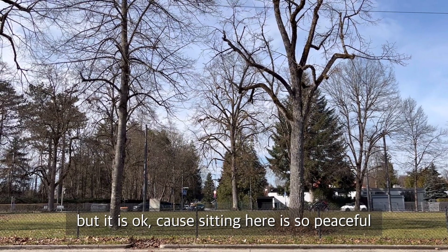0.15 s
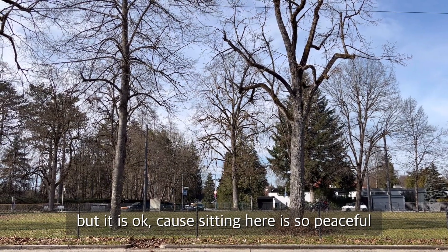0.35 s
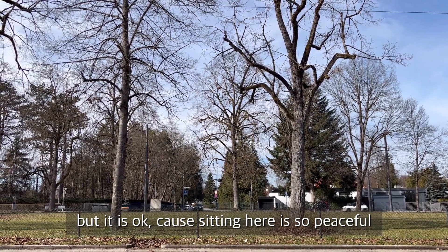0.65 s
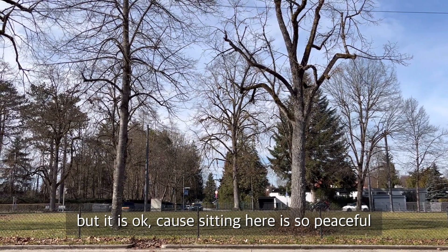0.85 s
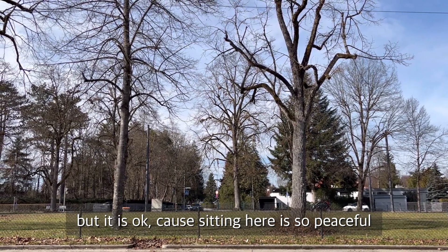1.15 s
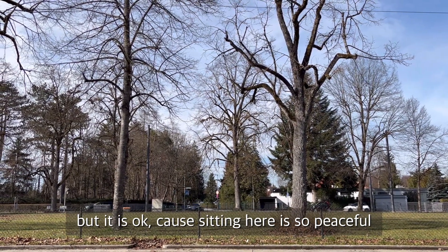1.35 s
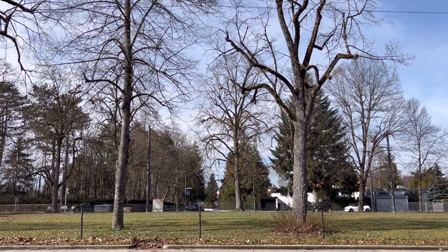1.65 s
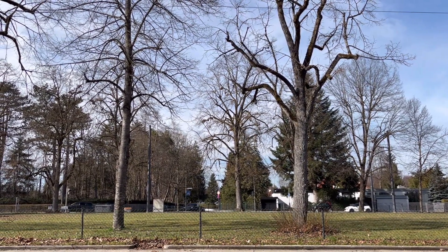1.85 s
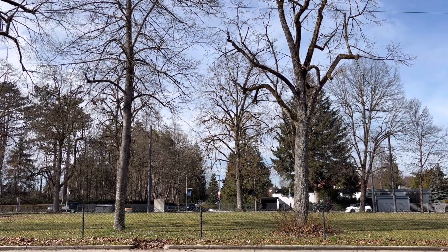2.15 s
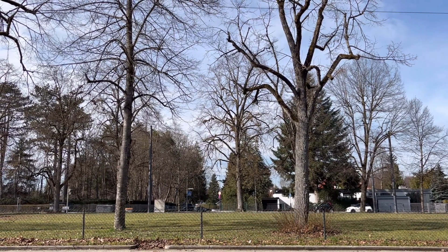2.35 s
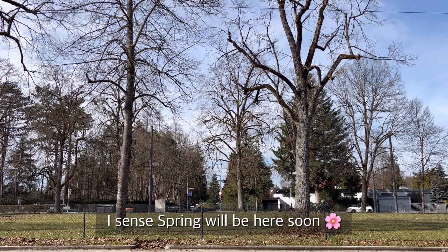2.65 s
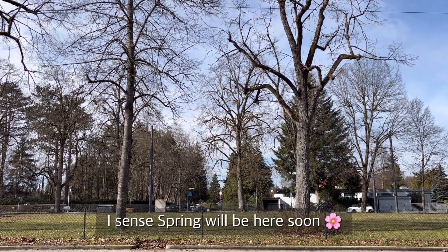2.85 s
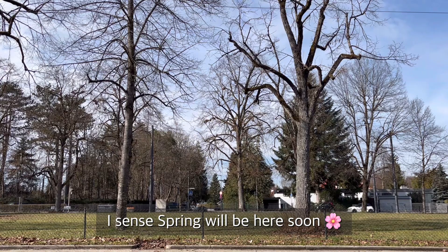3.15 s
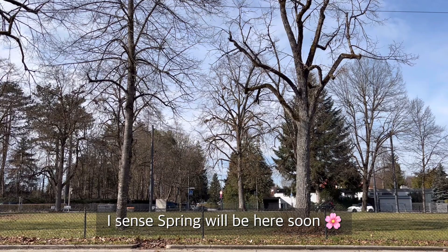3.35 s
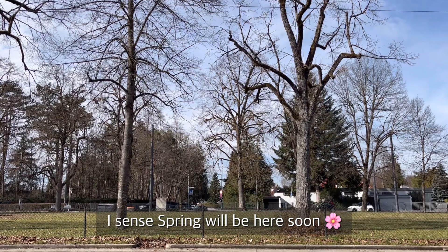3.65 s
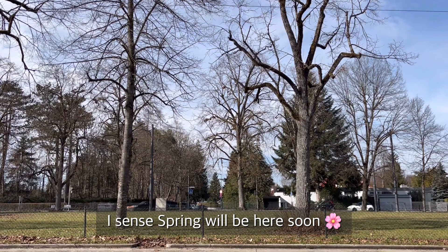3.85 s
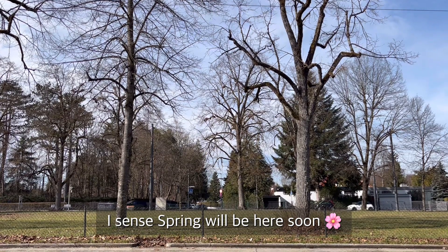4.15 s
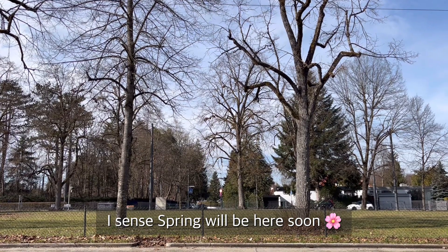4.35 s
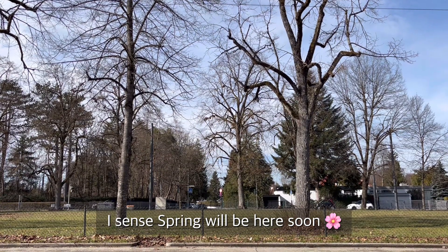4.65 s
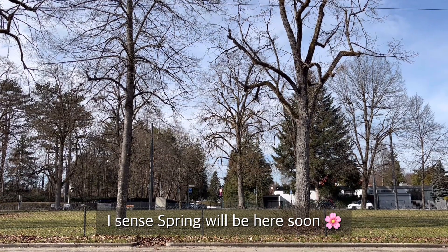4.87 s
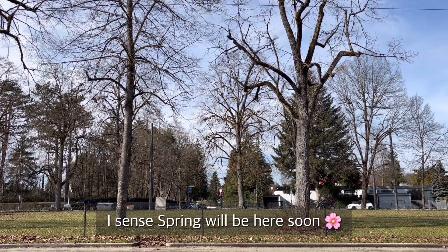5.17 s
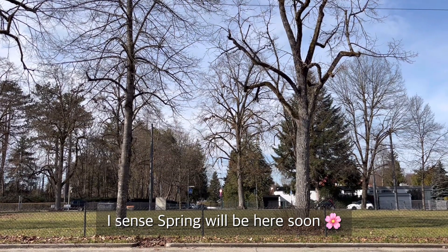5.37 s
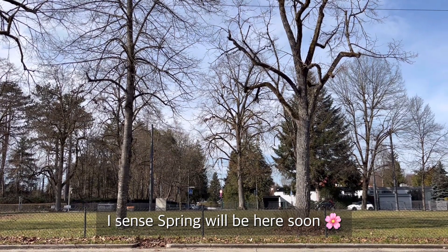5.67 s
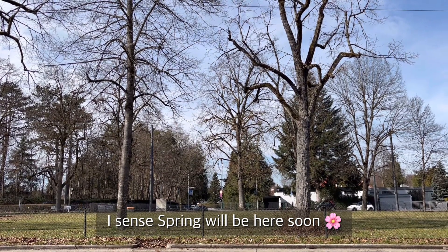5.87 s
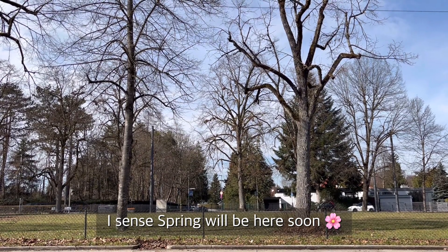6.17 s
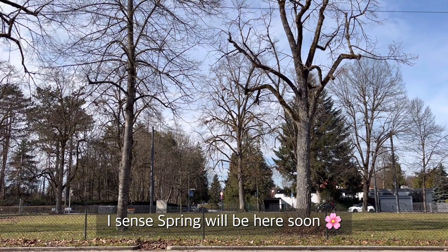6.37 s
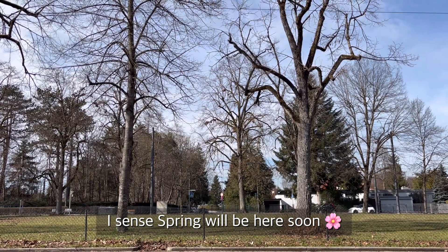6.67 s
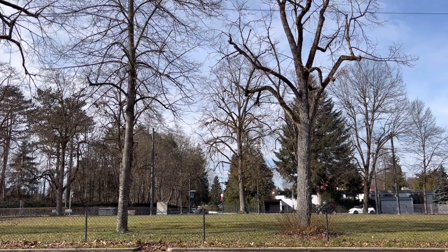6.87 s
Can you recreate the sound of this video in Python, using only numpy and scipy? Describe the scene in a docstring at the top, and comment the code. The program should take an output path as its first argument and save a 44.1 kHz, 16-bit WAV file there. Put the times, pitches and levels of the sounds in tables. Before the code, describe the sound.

From the edge of a park lawn, the microphone picks up a constant low rumble and wash of distant cars. Faint bird peeps come first, followed by two long, very high whistles. A closer bird then sings six quick upward slurs, the clearest sound, and two brief chirps follow. The trees scatter the calls back, while faint rustling and tiny ticks come and go.

```python
"""Far traffic rumbles behind the trees of a park: tyres hiss and slowly fade, one engine winds down.
Small birds call over it in gliding near-pure tones: a few far peeps, two thin high whistles,
a song of six rising slurs (the main source), two short chirps. Branches, trunks and houses scatter
the calls back. Traffic is shaped noise plus low exhaust orders; a soft rustle comes and goes,
and a few faint dry ticks sound close by."""
import sys
import numpy as np
from scipy import signal
from scipy.fft import rfft, irfft
from scipy.io import wavfile
from scipy.ndimage import uniform_filter1d

SR = 44100
rng = np.random.default_rng(int(sys.argv[2]) if len(sys.argv) > 2 else 0)


def inscribe(sig):
    """Save sig as 16-bit PCM at rate SR to the path in sys.argv[1].

    A 1-D sig is mono; a 2-D sig holds one channel per row.
    Samples are clipped to [-1, 1] before scaling.
    """
    pcm = np.round(np.clip(np.atleast_2d(sig).T, -1, 1) * 32767)
    wavfile.write(sys.argv[1], SR, pcm.astype(np.int16))


N = 309141
TIME = np.arange(N) / SR

# Table levels are relative: each source adds its own gain.
# Diffuse sound at the two microphone ports
PORT_COHERENCE = [(60, 1), (115, 0.38), (180, 0.92), (260, 0.94), (370, 0.74), (670, 0.43), (1230, 0.15),
                  (2240, -0.1), (4100, 2.54), (7500, 0.2), (13700, -1.7)]  # f/Hz, coherence (clipped to 0..1 in use)
PORT_LEAD = [(100, 0), (400, 0.78), (780, 1.15), (1290, 0.5), (1720, 6), (2070, 6.5), (3270, 8), (4000, 7),
             (5700, 7.5), (7000, 6)]  # f/Hz, left lead/rad
PORT_TILT = [(60, -3.5), (110, 1.5), (200, -1.5), (370, 2.5), (670, 3), (1230, 1.5), (2240, -0.5),
             (4100, 1.5), (7500, 0), (13700, 0)]  # f/Hz, left minus right/dB
# Park reverberation: f/Hz, T60/s
PARK_T60 = [(2500, 2), (3100, 1.3), (4000, 1), (5000, .5), (7300, 0.55)]

# Noise spectra: f/Hz, density/dB
MIC_HISS_SPECTRUM = [(100, 1), (5000, 1), (8300, 3), (10000, -16), (11200, 0), (12500, -0.5), (14000, -5.5)]
RUMBLE_SPECTRUM = [(18, -25.5), (33, -18.5), (50, -2), (66, 0), (85, -5.5), (115, -8.5), (165, -13),
                   (260, -27.5), (600, -73.5)]
ROAD_DRONE_SPECTRUM = [(100, -31), (165, -10), (205, -5), (250, 0), (290, -4.5), (340, -14.5), (420, -25.5),
                       (700, -40), (1500, -83)]
FAR_TYRE_SPECTRUM = [(150, -13.5), (330, -0.5), (470, 3), (660, -3.5), (950, -7.5), (1330, -8.5),
                     (1580, -12.5), (1850, -15.5), (2250, -16.5), (2750, -24), (3400, -21.5), (4400, -32.5),
                     (5800, -52), (9000, -62)]
NEAR_TYRE_SPECTRUM = [(400, 1.5), (800, 3.5), (1350, 3.5), (1580, -2.5), (1850, -1), (2250, -2), (2750, -6),
                      (3400, -18), (4600, -18), (5800, -23.5), (8000, -36), (10000, -47.5), (14000, -59.5)]
RUSTLE_SPECTRUM = [(1200, -18), (2300, 2), (3300, -1), (4400, 1), (5300, -7.5), (6500, -7), (9000, -36)]
TICK_BODY_SPECTRUM = [(1000, -14), (4800, 3), (6500, -8), (8500, -28)]
TICK_CRACK_SPECTRUM = [(4000, -18), (7500, 3), (8600, -1), (10000, -11), (12400, 3), (14000, -11)]

# Traffic envelopes: t/s, level/dB
ROAD_DRONE_LEVEL = [(0, -49), (3, -50), (3.45, -47.5), (3.8, -49.5), (5.3, -50.5), (5.9, -52.5),
                    (7.01, -51)]
NEAR_TYRE_LEVEL = [(0, -67), (1.2, -65), (1.55, -63), (1.9, -64.5), (2.85, -65), (3.35, -65.5), (3.8, -68),
                   (4.6, -69.5), (5.2, -72), (5.8, -73), (6.4, -73), (6.65, -72.5), (7.01, -73)]
# Engine curves: t/s, firing rate/Hz, level/dB
SLOWING_ENGINE = [(0, 61.3, -64), (.55, 61.33, -55.5), (1.25, 60.6, -43.5), (1.6, 58.45, -57.5),
                  (2.25, 54.67, -41), (2.7, 52.25, -42.5), (3.2, 48.58, -65), (4.05, 43.45, -53.5),
                  (4.6, 39.88, -53.5), (5.25, 38.7, -56), (5.6, 37.2, -70)]
RUNNING_ENGINE = [(0, 62.14, -45), (.55, 62.96, -53), (1.4, 62.12, -50.5), (2.6, 63, -57),
                  (3.2, 64.63, -50.5), (4.15, 64.7, -48.5), (4.7, 63.5, -54), (5.6, 62.3, -52.5),
                  (6.8, 62.1, -51), (7.01, 62.8, -54)]
# Steady far engines: firing rate/Hz, level/dB, swell t/s, swell/dB
FAR_ENGINES = [(94, -63, 4.77, 12), (134.8, -65.5, 4.3, 6.5)]
# Rustle swells: t/s, width/s, level/dB
RUSTLE_SWELLS = [(1.53, 0.13, -83), (2.8, 0.28, -79), (3.95, 0.36, -83), (5.02, 0.32, -80)]
# Dry ticks: t/s, body re crack/dB, level/dB
TICK_EVENTS = [(3.180, -10, -70), (4.5675, -5, -72), (4.58, 6, -70), (4.779, 5, -74), (4.8645, -3, -75),
               (5.2454, 1, -65), (5.2493, 4, -75), (5.4532, 4, -75), (5.458, 11, -79), (5.6025, -4, -74),
               (5.606, -8, -74)]

# Distant held whistles and far peeps: t/s, length/s, f/Hz, level/dB
FAR_WHISTLE_NOTES = [(0.78, 0.36, 5890, -97), (1.248, 0.32, 5930, -100), (3.12, .34, 6020, -98),
                     (3.73, 0.25, 6020, -95), (4.043, 0.23, 5960, -97), (5.878, .22, 5940, -99),
                     (6.24, .26, 6060, -99), (6.62, 0.18, 6010, -100)]
PEEP_NOTES = [(0, 0.037, 4920, -78), (0.067, 0.14, 4092, -70.5), (0.258, 0.071, 3700, -77),
              (1.068, 0.025, 6600, -82), (4.078, .075, 5010, -73), (4.327, 0.11, 4085, -73.5),
              (5.474, 0.044, 3530, -78)]
# Thin whistles: t/s, length/s, f/Hz, mid-note sag/Hz, quaver/share of f, level/dB
THIN_WHISTLE_NOTES = [(2.42, .575, 7226, 80, .009, -65), (3.812, .53, 7373, 19.6, 0.0072, -74)]
# Chirps: t/s, length/s, scoop/s, f/Hz, level/dB
CHIRP_NOTES = [(6.053, .085, .056, 4010, -64.5), (6.328, 0.086, .064, 3914, -69.5)]
# Song slurs: t/s, rise/s, first f/Hz, top f/Hz, bow (1 = straight), catch/Hz,
# onset/dB, easing at the top/dB, level/dB
SONG_SLURS = [(4.359, .097, 2314, 3276, 1.0, 11, -11, -0.5, -49),
              (4.566, .101, 2230, 3290, .56, 60, -12, -3.5, -45),
              (4.761, 0.11, 2225, 3225, .66, 70, -7.5, -1, -50.5),
              (4.988, 0.11, 2390, 3223, .81, 29.5, -5, -2.5, -52),
              (5.236, .11, 2345, 3173, 1.1, 24, -4.5, -3, -53),
              (5.532, 0.092, 2404, 3066, 1.25, -1, -5, -2.5, -53)]
# Song filters for the direct path, the return from the trees and the overtone: f/Hz, gain/dB
DIRECT_EQ = [(2280, -3.5), (2570, -6), (2670, -6.5), (2735, 3.5), (2810, -5), (2910, 1), (3010, 3),
             (3140, -5), (3270, 0.5), (4000, -8)]
TREE_EQ = [(2300, -3), (2750, 0), (3020, 1.5), (3170, -2), (3300, -5)]
OVERTONE_EQ = [(11500, -18), (12700, 0)]


def amp(db):
    """Decibels to gain."""
    return 10 ** (np.asarray(db) / 20)


def unit(x):
    """Scale to rms 1."""
    return x / np.sqrt(np.mean(abs(x) ** 2) + 1e-30)


def over_hz(points, hz):
    """Interpolate on a log-frequency axis."""
    f, value = np.transpose(points)
    return np.interp(np.log(hz + 1), np.log(f + 1), value)


def over_time(rows):
    """Interpolate each column at every sample."""
    times_s, *columns = np.transpose(rows)
    return [np.interp(TIME, times_s, column) for column in columns]


def swell(at_s, width_s):
    """Gaussian hump of height 1."""
    return np.exp(-((TIME - at_s) / width_s) ** 2)


def wander(rate_hz):
    """Low-passed random drift, rms 1."""
    hz = np.fft.rfftfreq(N, 1 / SR)
    return unit(irfft(rfft(rng.standard_normal(N)) * np.exp(-(hz / rate_hz) ** 2), N))


def coloured(x, eq):
    """Zero-phase filter by a gain table."""
    return irfft(rfft(x) * amp(over_hz(eq, np.fft.rfftfreq(N, 1 / SR))), N)


def patchy(x, depth_db, width_hz, length_s, size=2048):
    """Narrow bands swell and fade independently."""
    bins = signal.stft(x, SR, nperseg=size)[2]
    field = rng.standard_normal(bins.shape[1:])
    field = uniform_filter1d(field, max(1, round(width_hz * size / SR)), 0)
    field = uniform_filter1d(field, max(1, round(length_s * 2 * SR / size)), 1)
    return signal.istft(bins * amp(depth_db * unit(field)), SR, nperseg=size)[1][:, :N]


def ports(tone, pan_db, lead_rad=0):
    """Complex tone to stereo; positive pan and lead favour the left port."""
    left_gain = amp(pan_db / 2) * np.exp(0.5j * lead_rad)
    return np.array([tone * left_gain, tone / left_gain]).real


def diffuse(spectrum):
    """Noise from all around, mid rms 1: alike at both ports in the bass, less so above."""
    hz = np.fft.rfftfreq(N, 1 / SR)
    left, other = rfft(rng.standard_normal((2, N)))
    coherence = np.clip(over_hz(PORT_COHERENCE, hz), 0, 1)
    right = coherence * left + np.sqrt(1 - coherence ** 2) * other
    right *= np.exp(-1j * over_hz(PORT_LEAD, hz))
    tilt = amp(over_hz(PORT_TILT, hz) / 2)
    pair = irfft(np.array([left * tilt, right / tilt]) * amp(over_hz(spectrum, hz)), N)
    return pair / pair.mean(0).std()


def echoes(x, early_db, tail_db, early_s=0.0058, coherence=0.77, taps_per_s=3000, build_s=0.019):
    """Near branches blur a call; trunks and houses further off add a thin tail."""
    t = np.arange(SR) / SR
    common, own = rng.standard_normal((1, SR)), rng.standard_normal((2, SR))
    taps = np.sqrt(coherence) * common + np.sqrt(1 - coherence) * own
    taps *= rng.random(SR) < taps_per_s / SR
    early = taps * t * np.exp(-t / early_s)
    hz, age_s, bins = signal.stft(taps, SR, nperseg=256)
    decay = amp(-60 * age_s / over_hz(PARK_T60, hz)[:, None])
    tail = signal.istft(bins * decay, SR, nperseg=256)[1][:, :SR] * (1 - np.exp(-t / build_s))
    response = (amp(early_db) * unit(early) + amp(tail_db) * unit(tail)) / np.sqrt(SR)
    return signal.fftconvolve(x, response, axes=1)[:, :N]


def scatter(x, early_db, tail_db):
    """Call plus echoes."""
    return x + echoes(x, early_db, tail_db)


def mic_hiss(level_db=-91):
    """Steady microphone self-noise."""
    return amp(level_db) * diffuse(MIC_HISS_SPECTRUM)


def traffic(rumble_db=-52, far_tyre_db=-62, flutter_db=1, far_follow_share=0.23):
    """Rumble, drone and tyre wash of many far cars; brighter tyres pass nearer."""
    rumble = diffuse(RUMBLE_SPECTRUM) * amp(rumble_db)
    drone_db = over_time(ROAD_DRONE_LEVEL)[0]
    drone = diffuse(ROAD_DRONE_SPECTRUM) * amp(drone_db + flutter_db * wander(9))
    near_db = over_time(NEAR_TYRE_LEVEL)[0]
    far_db = far_tyre_db + far_follow_share * (near_db - near_db.mean())
    far_tyres = diffuse(FAR_TYRE_SPECTRUM) * amp(far_db + flutter_db * wander(3.9))
    near_tyres = diffuse(NEAR_TYRE_SPECTRUM) * amp(near_db + flutter_db * wander(24))
    # paths from moving cars shift, so the colour drifts
    far_tyres = patchy(far_tyres, depth_db=1.6, width_hz=90, length_s=0.2)
    near_tyres = patchy(near_tyres, depth_db=1.2, width_hz=450, length_s=0.14)
    return rumble + drone + far_tyres + near_tyres


def exhaust(hz, waver_share=0.008):
    """One exhaust order, complex; engine speed wavers slightly."""
    wavering_hz = hz * (1 + waver_share * wander(4.42))
    return np.sqrt(2) * np.exp(2j * np.pi * np.cumsum(wavering_hz) / SR)


def slowing_engine(second_db=-64, sink_db_per_s=0.9, swell_db=10.5):
    """Two exhaust orders wind down; the second sinks in level and swells once."""
    hz, first_db = over_time(SLOWING_ENGINE)
    shape_db = swell_db * swell(at_s=3.25, width_s=0.73) - sink_db_per_s * TIME
    return amp(first_db) * exhaust(hz) + amp(second_db + shape_db) * exhaust(2 * hz)


def engines(steady_gain_db=-1, fading_db=0.5):
    """Only the lowest exhaust orders carry this far; the air makes them swell and fade."""
    slowing = slowing_engine()
    hz, running_db = over_time(RUNNING_ENGINE)
    steady = amp(running_db + fading_db * wander(2.5)) * exhaust(hz)
    for firing_hz, db, at_s, swell_db in FAR_ENGINES:
        level_db = db + swell_db * swell(at_s, width_s=0.097) + fading_db * wander(2.8)
        steady += amp(level_db) * exhaust(firing_hz)
    return ports(slowing + amp(steady_gain_db) * steady, pan_db=-1.5)


def rustle(flicker_db=2.5):
    """Soft bright noise that comes and goes."""
    envelope = sum(amp(db) * swell(at_s, width_s) for at_s, width_s, db in RUSTLE_SWELLS)
    return diffuse(RUSTLE_SPECTRUM) * envelope * amp(flicker_db * wander(30))


def ticks(rise_s=0.00015, decay_s=0.00083, tail_db=-19, tail_s=0.029):
    """Tiny close snaps, often paired, each with a short rustling tail."""
    body, crack = np.zeros(N), np.zeros(N)
    for start_s, body_db, db in TICK_EVENTS:
        age_s = np.maximum(TIME - start_s, 0)
        decay = np.exp(-age_s / decay_s) + amp(tail_db) * np.exp(-age_s / tail_s)
        envelope = (1 - np.exp(-age_s / rise_s)) * decay
        body += amp(db + body_db) * envelope
        crack += amp(db) * envelope
    return crack * diffuse(TICK_CRACK_SPECTRUM) + body * diffuse(TICK_BODY_SPECTRUM)


def bird_tone(notes, quaver_share, quaver_hz, edge_s=0.0053):
    """Complex tone with a fast pitch quaver. Notes: start/s, f curve/Hz, level curve/dB."""
    tone = np.zeros(N, complex)
    quaver = 1 + quaver_share * wander(quaver_hz)
    for start_s, hz, db in notes:
        t = np.arange(len(hz)) / SR
        span = round(start_s * SR) + np.arange(len(hz))
        gate = np.sin(np.pi / 2 * np.clip(np.minimum(t, t[-1] - t) / edge_s, 0, 1)) ** 2
        phase_rad = 2 * np.pi * np.cumsum(hz * quaver[span]) / SR
        tone[span] += np.sqrt(2) * gate * amp(db) * np.exp(1j * phase_rad)
    return tone


def far_whistles(gain_db=-1, flutter_db=4):
    """A very distant bird holds faint notes of steady pitch."""
    notes = []
    for start_s, length_s, hz, db in FAR_WHISTLE_NOTES:
        held = np.ones(round(length_s * SR))
        notes.append((start_s, hz * held, db * held))
    tone = bird_tone(notes, quaver_share=0.004, quaver_hz=120, edge_s=0.04)
    tone *= amp(gain_db + flutter_db * wander(22))
    return scatter(ports(tone, pan_db=1.5), early_db=-4, tail_db=-2.5)


def peeps(gain_db=-4, drop_hz=197, drop_s=0.011, attack_s=0.026, onset_db=-8,
          fade_db_per_s=29, flutter_db=2.5):
    """A far bird drops onto its pitch during the attack, then fades."""
    notes = []
    for start_s, length_s, hz, db in PEEP_NOTES:
        t = np.arange(0, length_s, 1 / SR)
        attack_db = onset_db * np.maximum(1 - t / attack_s, 0)
        fade_db = fade_db_per_s * np.maximum(t - attack_s, 0)
        notes.append((start_s, hz + drop_hz * np.exp(-t / drop_s), db + attack_db - fade_db))
    tone = bird_tone(notes, quaver_share=0.007, quaver_hz=140)
    tone *= amp(gain_db + flutter_db * wander(45))
    return scatter(ports(tone, pan_db=5.5, lead_rad=0.42), early_db=-6, tail_db=-3.5)


def thin_whistles(gain_db=-2, onset_db=-16, swell_s=0.06):
    """A bird's long high notes swell, hold and sag in pitch midway."""
    tone = np.zeros(N, complex)
    for start_s, length_s, pitch_hz, sag_hz, quaver_share, db in THIN_WHISTLE_NOTES:
        t = np.arange(0, length_s, 1 / SR)
        hz = pitch_hz - sag_hz * np.sin(np.pi * t / length_s)
        level_db = gain_db + db + onset_db * np.exp(-t / swell_s)
        tone += bird_tone([(start_s, hz, level_db)], quaver_share, quaver_hz=149)
    return scatter(ports(tone, pan_db=0.5, lead_rad=-0.27), early_db=-0.5, tail_db=-3)


def chirps(gain_db=1, scoop_hz=338, sag_hz_per_s=900, onset_db=-15, peak_share=0.74):
    """A bird scoops up to its pitch; loudest late in each note."""
    notes = []
    for start_s, length_s, scoop_s, pitch_hz, db in CHIRP_NOTES:
        t = np.arange(0, length_s, 1 / SR)
        hz = pitch_hz - scoop_hz * np.maximum(1 - t / scoop_s, 0) ** 2
        hz -= sag_hz_per_s * np.maximum(t - scoop_s, 0)
        shape_db = onset_db * (1 - t / (peak_share * length_s)) ** 2
        notes.append((start_s, hz, gain_db + db + shape_db))
    tone = bird_tone(notes, quaver_share=0.004, quaver_hz=120)
    return scatter(ports(tone, pan_db=2.5, lead_rad=-0.17), early_db=-12, tail_db=-11.5)


def rising_slur(start_s, rise_s, first_hz, top_hz, bow, catch_hz, onset_db, top_db, db):
    """One song note: soft husky start, upward glide with a catch, quick fading flick down."""
    swell_s, husk_hz, husk_s = 0.038, 90, 0.035
    catch_at, catch_width, top_width = 0.55, 0.19, 0.18  # shares of the climb
    flick_s, flick_hz, flick_db = 0.028, 480, -5.5
    t = np.arange(0, rise_s + flick_s, 1 / SR)
    climb = np.minimum(t / rise_s, 1)
    fall = np.maximum(t - rise_s, 0) / flick_s
    hz = first_hz + (top_hz - first_hz) * climb ** bow - flick_hz * fall ** 3
    hz -= catch_hz * np.exp(-((climb - catch_at) / catch_width) ** 2)
    hz += husk_hz * np.exp(-t / husk_s) * wander(250)[:len(t)]
    near_top = np.exp(-((1 - climb) / top_width) ** 2)
    shape_db = onset_db * np.exp(-t / swell_s) + top_db * near_top + flick_db * fall
    return start_s, hz, db + shape_db


def song(gain_db=-1.5, flutter_db=2.5, overtone_db=-110.5):
    """Nearest bird: the direct path favours some pitches, the trees return a broad wash."""
    flutter = amp(flutter_db * wander(70))
    notes = [rising_slur(*row) for row in SONG_SLURS]
    tone = flutter * bird_tone(notes, quaver_share=0.008, quaver_hz=173)
    voice = ports(tone, pan_db=-1, lead_rad=0.93)
    direct = coloured(voice, DIRECT_EQ)
    wash = echoes(coloured(voice, TREE_EQ), early_db=-6.5, tail_db=-12, early_s=0.008, coherence=0.32)
    # squared envelope: the faint fourth harmonic favours the loudest tops
    fourth = ports(abs(tone) ** 2 * np.exp(4j * np.angle(tone)), pan_db=0)
    overtone = amp(overtone_db) * unit(coloured(fourth, OVERTONE_EQ))
    return amp(gain_db) * (direct + wash) + scatter(overtone, early_db=-2, tail_db=-16)


def scene():
    """Stereo mix at the edge of the lawn."""
    background = traffic() + mic_hiss() + engines() + rustle()
    return background + song() + thin_whistles() + chirps() + peeps() + far_whistles() + ticks()


def record(dry):
    """Soft ends, 14 kHz low-pass."""
    faded = dry * signal.windows.tukey(N, 0.002)
    lowpass = signal.firwin(511, 14000, window=("kaiser", 9), fs=SR)
    return signal.oaconvolve(faded, lowpass[None], "same")


dry = scene()
out = record(dry)
inscribe(out)
```